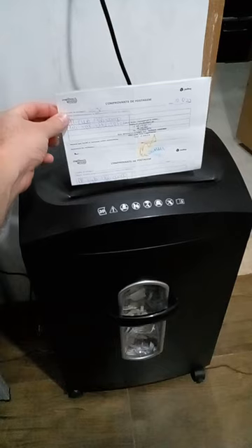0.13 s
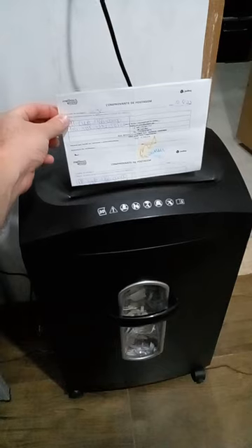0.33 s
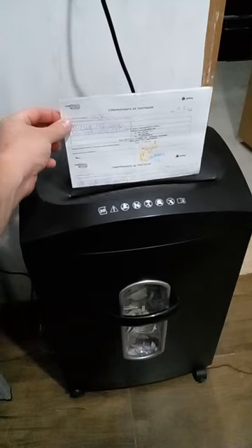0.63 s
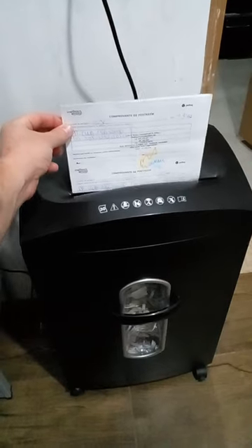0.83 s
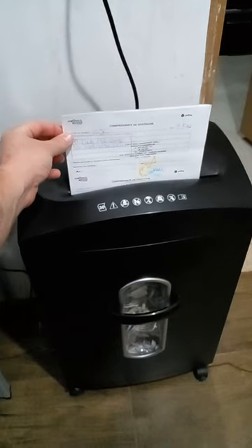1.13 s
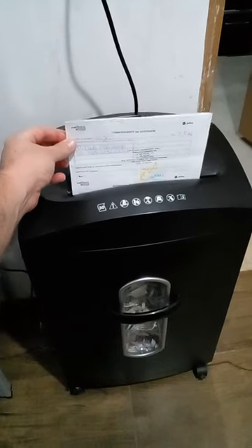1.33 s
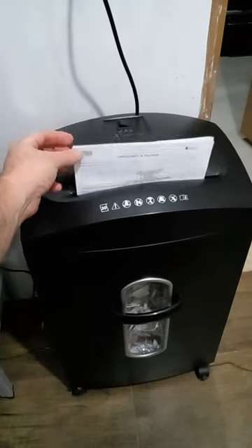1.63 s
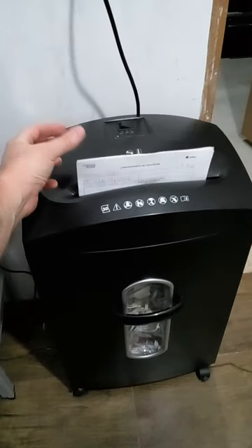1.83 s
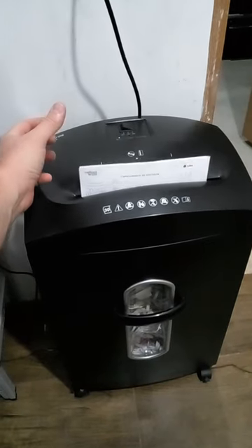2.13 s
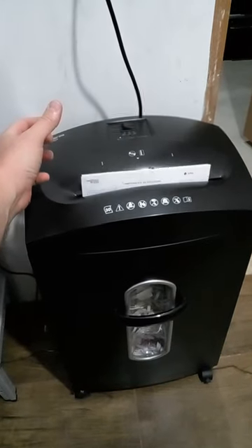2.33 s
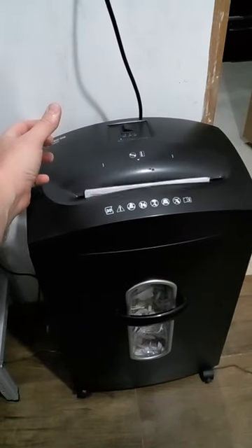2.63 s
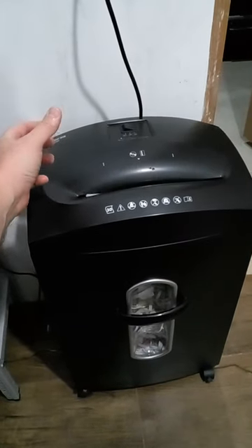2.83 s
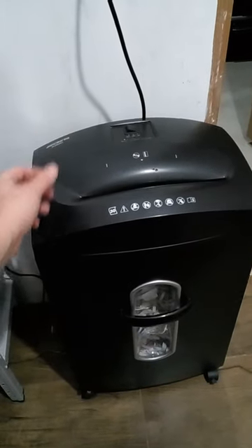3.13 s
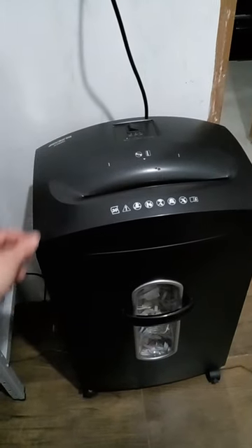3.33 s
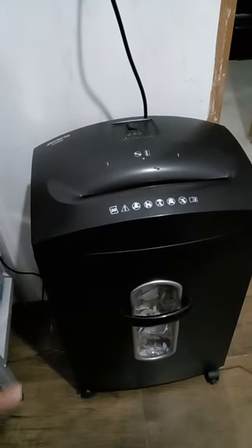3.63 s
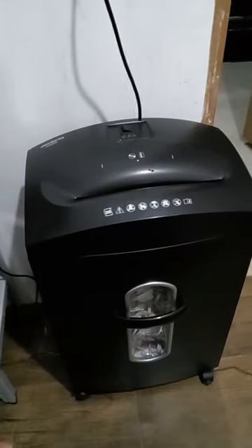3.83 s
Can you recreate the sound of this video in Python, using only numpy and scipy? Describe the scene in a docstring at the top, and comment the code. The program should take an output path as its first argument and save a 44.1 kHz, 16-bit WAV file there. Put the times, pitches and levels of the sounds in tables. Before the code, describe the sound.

Paper shredder starting abruptly in a quiet room, its motor whirring as paper crackles through.

```python
"""Paper shredder, one sheet

A shredder snaps on in a small, quiet room. The motor hums at twice the mains frequency and spins up,
and its reduction gear rattles in the plastic housing with much the same pattern every turn. The
cutters crackle through the paper and loose shreds sizzle past the blades, until the sheet is gone
and the motor runs a little faster."""
import sys
import numpy as np
from scipy import signal
from scipy.fft import rfft, irfft, next_fast_len
from scipy.io import wavfile
from scipy.ndimage import uniform_filter1d, map_coordinates

SR = 44100
rng = np.random.default_rng(int(sys.argv[2]) if len(sys.argv) > 2 else 0)


def materialize(psi):
    """Save the field psi as 16-bit PCM at rate SR to the path in sys.argv[1].

    A 1-D psi becomes a single channel; in a 2-D psi each row is a channel.
    """
    bounded = np.clip(np.atleast_2d(psi).T, -1, 1)
    quanta = np.round(bounded * 32767).astype(np.int16)
    wavfile.write(sys.argv[1], SR, quanta)


N = 176400

ON_S, ENGAGE_S = 1.428, 0.15  # switch-on; time for the gears to take up the load
MAINS_HZ, BITE_HZ, TOP_HZ = 60.05, 76, 15750
GEAR_RATIO, TEETH = 8, 48
ROOM_T60_S, ROOM_WET_DB = 0.32, -6

# Room tone colour. Each row: frequency in Hz, relative level in dB.
AIR_EQ = [(20, -35), (50, -10), (105, -12), (125, 1.5), (160, -7), (200, -11.5), (280, -3), (430, -4.5),
          (700, -7.5), (1000, -12), (1200, -15.5), (1450, -15.5), (2000, -19.5), (3200, -33.5), (4000, -33),
          (5000, -39.5), (15500, -38.5)]
# Room tone fader. Each row: time in seconds, level in dB.
AIR_FADER = [(.06, -110), (.066, -65), (.6, -63), (.78, -62.5), (.85, -64.5), (1.02, -61), (1.2, -62.5),
             (1.4, -60.5)]
# Faint drone in the room. Each row: pitch in Hz, level in dB.
DRONE_TONES = [(125.7, -76), (272, -70.5)]
# Colour of the switch snap. Each row: frequency in Hz, relative level in dB.
SNAP_EQ = [(40, -20), (200, 3), (500, 10.5), (700, 10), (1300, -0.5), (2500, 0), (6000, -2), (7500, -7),
           (9000, -4), (11000, -11), (12500, -6.5), (16000, -11)]
# Ringing housing panels. Each row: pitch in Hz, level in dB before the fade.
PANEL_MODES = [(780, -49.5), (871, -48.5), (997, -51.5), (1222, -49), (1341, -51), (1392, -53)]
# Gearbox resonances. Each row: pitch in Hz, level in dB, depth of the shaft pulse from 0 to 1.
RASP_MODES = [(1390, -54, 0.3), (2286, -54, .7), (2755, -53, 0.13), (2986, -55, 0), (5870, -65.5, 0.3)]
# Colour of brushes and bearings. Each row: frequency in Hz, relative level in dB.
WHIRR_EQ = [(40, -35), (65, 8.5), (85, 8), (200, 7.5), (600, 8), (1000, -0.5), (1700, 1.5), (2300, -3),
            (2550, -2.5), (2900, 0.5), (3300, -6.5), (4300, -4.5), (5100, -10), (5900, -10.5), (7000, -19),
            (11000, -26), (16000, -26)]
# Motor speed. Each row: time in seconds, shaft turns per second.
SHAFT_SPEED = [(1.43, 60), (1.5, 71), (1.58, 76), (1.8, 77.5), (1.96, 81.6), (2.25, 82.1), (2.65, 81.6),
               (3.0, 81.7), (3.5, 81.9), (3.75, 83.2), (4.0, 83.6)]
# Motor whine. Each row: multiple of the shaft speed, level in dB.
SHAFT_PARTIALS = [(3, -39), (4, -44), (7, -41.5), (8, -44.5), (9, -48), (14, -53), (17, -54), (26, -61),
                  (27, -58), (28, -59.5), (29, -58), (33, -58.5), (36, -57.5), (43, -62)]
# Gear tones round the tooth rate. Each row: multiple of the wheel speed, full-speed level in dB.
WHEEL_PARTIALS = [(13, -44.5), (18, -42.5), (20, -45), (26, -44.5), (39, -46), (44, -41), (46, -41),
                  (47, -39.5), (48, -40), (49, -39), (50, -41.5), (52, -41.5), (58, -47)]
# Magnetic hum, strongest during spin-up. Each row: time in seconds, level in dB.
HUM_FADER = [(1.43, -71), (1.48, -32.5), (1.53, -23), (1.66, -20.5), (1.8, -20.5), (1.92, -26.5),
             (2.4, -26.5), (3.0, -26.5), (4.0, -26.5)]
# Overtones of the hum. Each row: multiple of the mains frequency, level in dB.
HUM_OVERTONES = [(4, -37), (6, -49), (8, -48), (10, -54)]
# Housing colour for the tooth knocks. Each row: frequency in Hz, relative level in dB.
HOUSING_EQ = [(40, -78.5), (70, -17), (110, -14.5), (180, -3), (250, -2.5), (310, -2), (360, -5), (420, 1),
              (490, -3.5), (555, -5.5), (600, -4.5), (670, -7.5), (710, -11), (950, -15.5), (1350, -20.5),
              (1600, -26), (3000, -31), (8000, -48.5)]
# Colour of sliding shreds. Each row: frequency in Hz, relative level in dB.
SHREDS_EQ = [(4000, -25), (7500, -6), (9000, -7.5), (10800, -7), (12700, 1.5), (14000, -4), (16000, -5.5)]
# Fader for the shreds. Each row: time in seconds, level in dB.
SHREDS_FADER = [(1.9, -68), (2.25, -56), (2.5, -62), (2.85, -53), (3.1, -55), (3.5, -59), (3.9, -72)]
# Colour of tearing paper. Each row: frequency in Hz, relative level in dB.
TEAR_EQ = [(400, -2.5), (1500, -3), (3000, 3), (4500, 2), (6000, 3.5), (7200, -2.5), (9000, -1.5),
           (11000, -2), (12800, -1.5), (16000, -2)]
# Fader for the tearing. Each row: time in seconds, level in dB.
TEAR_FADER = [(1.45, -70), (1.6, -65), (1.72, -51), (1.95, -49), (2.27, -46.5), (2.55, -47.5),
              (2.85, -48.5), (3.15, -55.5), (3.5, -51), (3.7, -58), (3.8, -50), (3.88, -71), (4.0, -70)]
# Sharp cracks of the sheet. Each row: start in seconds, level in dB.
CRACK_CUES = [(1.509, -39.5), (1.595, -43), (1.684, -35), (1.716, -33.5), (1.796, -40), (2.264, -35),
              (2.317, -39), (2.58, -45), (2.714, -41), (2.838, -35.5), (2.944, -38), (2.992, -39),
              (3.639, -40)]
# Colour of a crack. Each row: frequency in Hz, relative level in dB.
CRACK_EQ = [(500, 4), (2000, 0), (3100, 9), (5000, -4), (8000, -18), (16000, -30)]
# Bright ticks of single strips breaking. Each row: start in seconds, level in dB.
TICK_CUES = [(1.797, -48), (1.9465, -44), (2.104, -43), (2.2045, -42), (2.279, -43), (2.322, -46),
             (2.343, -41), (2.501, -39), (2.559, -47), (2.615, -38), (2.811, -39), (3.823, -44.5)]
# Colour of a tick. Each row: frequency in Hz, relative level in dB.
TICK_EQ = [(1500, -7), (5000, 0), (9000, 1), (13000, 0), (16000, -2)]


def amp(db):
    """Decibels to gain."""
    return 10 ** (np.asarray(db) / 20)


def unit(x):
    """Scale to rms 1."""
    return x / np.sqrt(np.mean(x ** 2) + 1e-20)


def clock():
    """Seconds at each sample."""
    return np.arange(N) / SR


def curve(rows):
    """Join (seconds, value) rows by straight lines."""
    return np.interp(clock(), *np.transpose(rows))


def rise(seconds):
    """Fade in from the moment of switch-on."""
    return np.clip((clock() - ON_S) / seconds, 0, 1)


def decay(start, t60):
    """Hard attack, then a fall of 60 dB every t60 seconds."""
    t = clock() - start
    return (t >= 0) * np.exp(-np.log(1000) * np.abs(t) / t60)


def wobble(rate):
    """Smooth random modulation, rate knots a second."""
    knots = rng.standard_normal(4096)
    times = np.linspace(0, N / SR, len(knots))
    return np.interp(clock(), times, map_coordinates(knots, [times * rate], mode="wrap"))


def colour(x, eq):
    """Minimum-phase EQ through (Hz, dB) points; result has rms 1."""
    size = 2 * next_fast_len(N * 3 // 4)
    hz, db = np.transpose(eq)
    gain = amp(np.interp(np.log(np.fft.rfftfreq(size, 1 / SR) + 1), np.log(hz), db))
    cepstrum = irfft(np.log(gain))
    cepstrum[1:size // 2] *= 2  # folded forward, so nothing rings ahead of a hit
    cepstrum[size // 2 + 1:] = 0
    return unit(irfft(rfft(x, size) * np.exp(rfft(cepstrum)))[:N])


def noise(eq):
    """Coloured noise of rms 1."""
    return colour(rng.standard_normal(N), eq)


def patchy(x, depth_db=2):
    """Let the colour shift in random patches; result has rms 1."""
    spectrum = signal.stft(x, nperseg=256)[2]
    patches = uniform_filter1d(rng.standard_normal(spectrum.shape), size=9, axis=0)
    patches = uniform_filter1d(patches, size=30, axis=1)
    return unit(signal.istft(spectrum * amp(depth_db * unit(patches)))[1][:N])


def resonate(x, hz, t60):
    """Ring one mode with x; result has rms 1."""
    ring = decay(0, t60) * np.sin(2 * np.pi * hz * clock())
    return unit(signal.fftconvolve(x, ring)[:N])


def pulses(times, sizes):
    """Clicks, each shared between two neighbouring samples."""
    at = np.clip(times * SR, 0, N - 1)
    i = at.astype(int)
    return (np.bincount(i, sizes * (1 - at + i), N + 1) + np.bincount(i + 1, sizes * (at - i), N + 1))[:N]


def tones(cycles, partials, waver_db, slip_rad):
    """Harmonics of a rotation, each wavering in level and phase."""
    stack = np.zeros(N)
    for multiple, db in partials:
        level = amp(db) * unit(amp(waver_db * wobble(12)))
        phase = 2 * np.pi * (round(multiple) * cycles + rng.random())
        stack += level * np.sin(phase + slip_rad * wobble(16))
    return np.sqrt(2) * stack


def room(x):
    """Blend in the short tail of a small room."""
    tail = (rng.standard_normal(N) * decay(0, ROOM_T60_S))[:SR // 2]
    wet = signal.fftconvolve(x, tail / np.linalg.norm(tail))[:N]
    return (x + amp(ROOM_WET_DB) * wet) / np.hypot(1, amp(ROOM_WET_DB))


def room_tone():
    """A quiet bed of air with a faint, unsteady drone."""
    drone = sum(amp(db + 2.2 * wobble(9.2)) * np.sin(2 * np.pi * hz * clock() + wobble(5.1))
                for hz, db in DRONE_TONES)
    return noise(AIR_EQ) * amp(curve(AIR_FADER)) + drone * (clock() > AIR_FADER[1][0])


def switch():
    """The snap of switching on and its ring in housing and room."""
    snap = amp(-42.5) * decay(ON_S, t60=0.03)
    ring = amp(-35) * decay(ON_S, t60=0.39)
    return noise(SNAP_EQ) * (snap + ring)


def panels(fade_db_per_s=1.5):
    """Shaken housing panels ring at once, then calm down as the machine settles."""
    shake = rng.standard_normal(N)
    ring = sum(amp(db) * resonate(shake, hz, t60=0.23) for hz, db in PANEL_MODES)
    return rise(0.054) * amp(-fade_db_per_s * (clock() - ON_S)) * ring


def gearbox_rasp(turns, swing_db=3.5, waver_db=3):
    """The gear wheel rubs harder once a turn, so the gearbox resonances flutter."""
    rub = rng.standard_normal(N) * amp(swing_db * np.sin(2 * np.pi * turns / GEAR_RATIO))
    shaft = np.sin(2 * np.pi * turns)
    rasp = np.zeros(N)
    for hz, db, depth in RASP_MODES:
        drive = rub * (1 + depth * shaft) * amp(waver_db * np.tanh(wobble(40)))
        rasp += amp(db) * resonate(drive, hz, t60=0.019)
    return rasp


def whirr(turns):
    """Brushes and bearings rub, pulsing once a shaft turn."""
    pulse = 1 + 0.14 * np.sin(2 * np.pi * turns)
    return amp(-41.5 + wobble(24.84)) * noise(WHIRR_EQ) * pulse


def whine(turns, speed, swell_db_per_decade=130):
    """Tones locked to the motor shaft, plus gear wheel tones that swell with speed."""
    swell = amp(swell_db_per_decade * np.log10(np.minimum(speed / np.median(speed), 1)))
    shaft = tones(turns, SHAFT_PARTIALS, waver_db=3, slip_rad=0.32)
    wheel = tones(turns / GEAR_RATIO, WHEEL_PARTIALS, waver_db=2.5, slip_rad=0.5)
    return shaft + swell * wheel


def motor_hum(turns, grab_s=1.715, grab_width_s=0.024):
    """Iron hums at even multiples of the mains; the starting surge presses a groan from the gear teeth."""
    level = amp(curve(HUM_FADER))
    hum = level * np.sin(4 * np.pi * MAINS_HZ * clock())
    surge = np.maximum(level - level[-1], 0) * rise(ENGAGE_S) ** 2
    grab = np.exp(-((clock() - grab_s) / grab_width_s) ** 2)  # the blades catch the sheet
    groan = (amp(-9) * surge + amp(-31) * grab) * np.sin(2 * np.pi * turns * TEETH / GEAR_RATIO)
    overtones = tones(MAINS_HZ * clock(), HUM_OVERTONES, waver_db=1.5, slip_rad=0.12) * rise(ENGAGE_S)
    return (np.sqrt(2) * (hum + groan) + overtones) * (clock() > ON_S)


def gear_rattle(turns, flaw_db=3.5, play_db=2.2, shake_db=2.5):
    """Each tooth knocks the housing; its flaws return every wheel turn, its play is new each time."""
    teeth_passed = turns * TEETH / GEAR_RATIO
    tooth = np.arange(1, int(teeth_passed[-1]))
    flaw_shift, flaw_size = rng.standard_normal((TEETH, 2))[tooth % TEETH].T
    play_shift, play_size = rng.standard_normal((len(tooth), 2)).T
    times = np.interp(tooth + 0.25 * flaw_shift + 0.1 * play_shift, teeth_passed, clock())
    knocks = pulses(times, amp(flaw_db * flaw_size + play_db * play_size))
    shake = unit(amp(shake_db * np.tanh(wobble(45))))
    return amp(-32) * shake * colour(knocks - knocks.mean(), HOUSING_EQ)


def shreds():
    """Cut strips slide off the blades with a high, shifting sizzle."""
    return patchy(noise(SHREDS_EQ)) * amp(curve(SHREDS_FADER)) * (clock() > SHREDS_FADER[0][0])


def cutters(fibres_per_s=7000, spread_db=3):
    """Fibres tear in bunches as each row of blades bites; the sheet cracks and single strips tick."""
    when, polarity, strength = rng.random((int(fibres_per_s * N / SR), 3)).T
    sizes = np.sign(polarity - 0.5) * amp(-spread_db * np.log(strength + 0.0038))  # a few stand out
    fibres = pulses(when * N / SR, sizes)
    bite = 1 + 0.31 * np.sin(2 * np.pi * BITE_HZ * clock() + 0.4 * wobble(5.5))
    tearing = patchy(colour(fibres * bite, TEAR_EQ))
    level = amp(curve(TEAR_FADER) + 0.8 * wobble(30.2)) * (clock() > ON_S)
    cracks = noise(CRACK_EQ) * sum(amp(db) * decay(start, t60=0.05) for start, db in CRACK_CUES)
    ticks = noise(TICK_EQ) * sum(amp(db) * decay(start, t60=0.026) for start, db in TICK_CUES)
    return level * tearing + cracks + ticks


def scene():
    """The mono mix: shaft speed paces the running parts, which fade in as the gears engage."""
    speed = curve(SHAFT_SPEED) * (1 + 0.00201 * wobble(12))  # slight flutter
    turns = np.cumsum(speed) / SR
    running = gear_rattle(turns) + whine(turns, speed) + whirr(turns) + gearbox_rasp(turns)
    machine = rise(ENGAGE_S) * running + panels() + motor_hum(turns)
    paper = room(cutters()) + shreds()
    return (machine + paper + switch() + room_tone())[None]


def record(dry):
    """A brick-wall high cut on the whole mix."""
    size = next_fast_len(N + SR // 2)
    passband = np.fft.rfftfreq(size, 1 / SR) < TOP_HZ
    return irfft(rfft(dry, size) * passband, size)[..., :N]


dry = scene()
out = record(dry)
materialize(out)
```